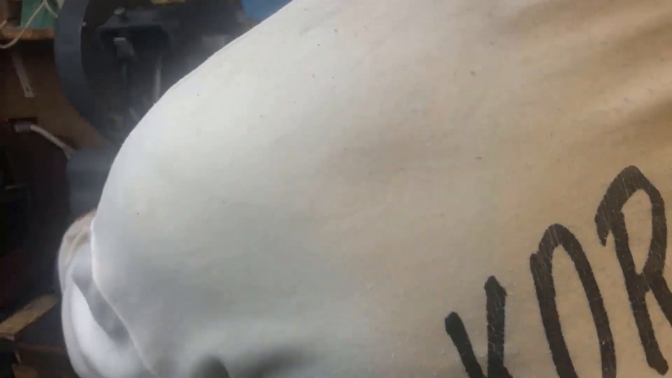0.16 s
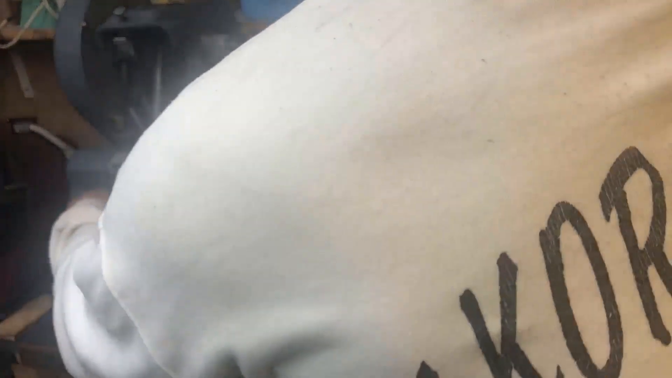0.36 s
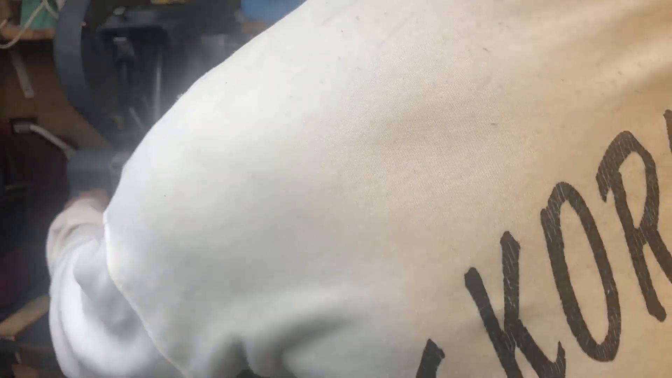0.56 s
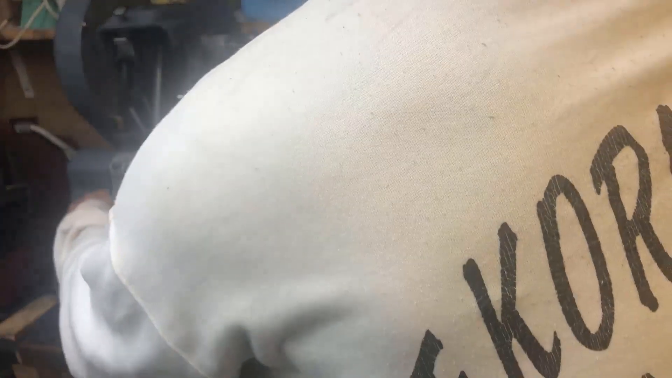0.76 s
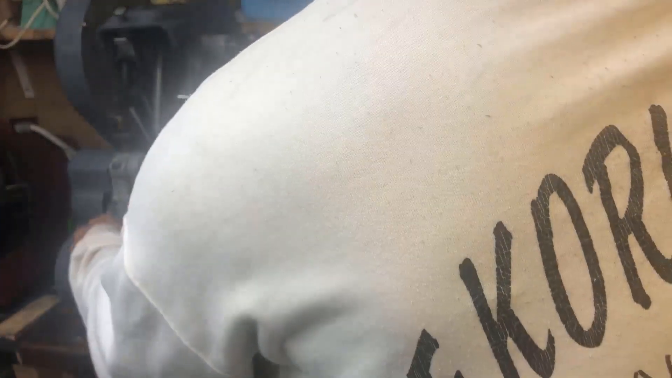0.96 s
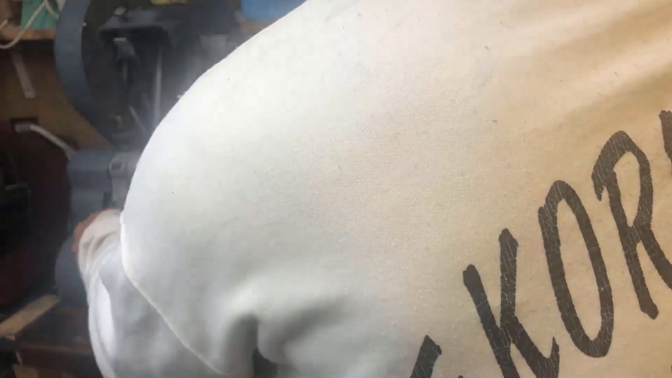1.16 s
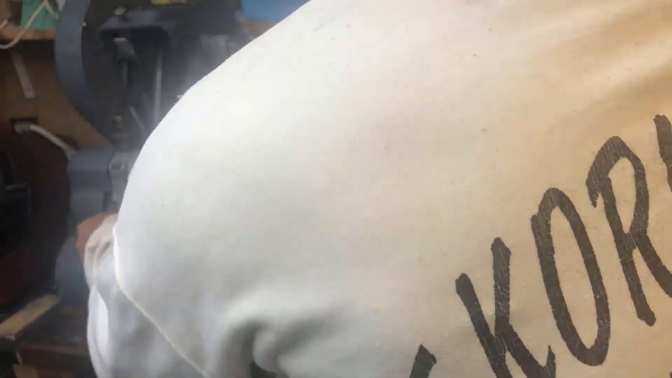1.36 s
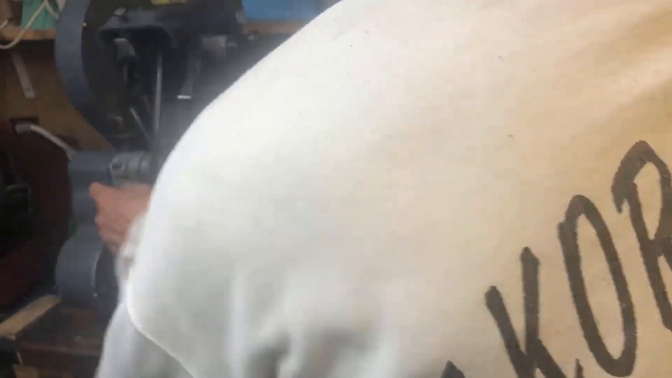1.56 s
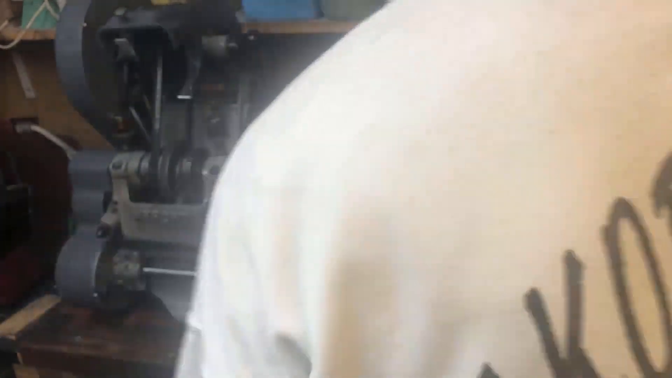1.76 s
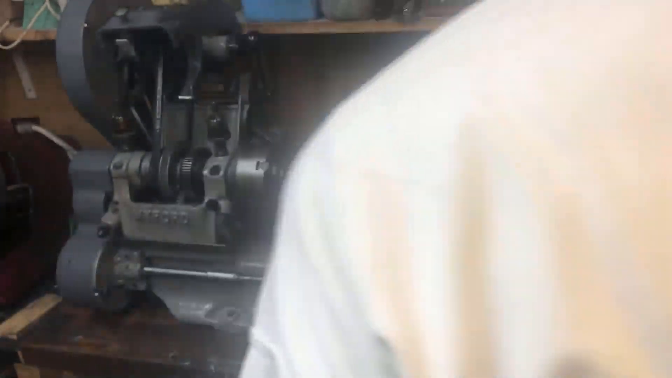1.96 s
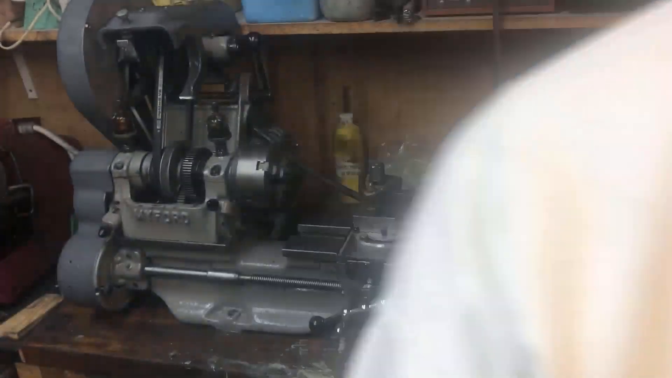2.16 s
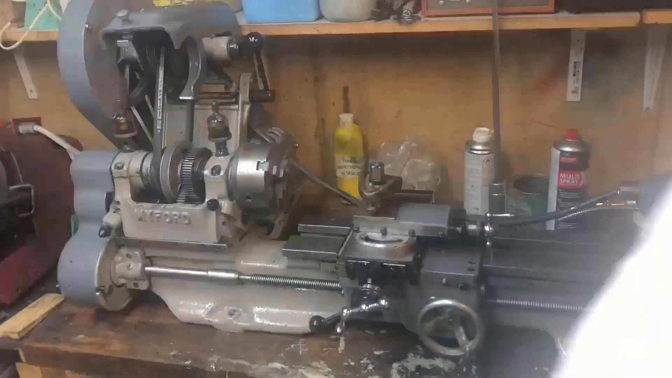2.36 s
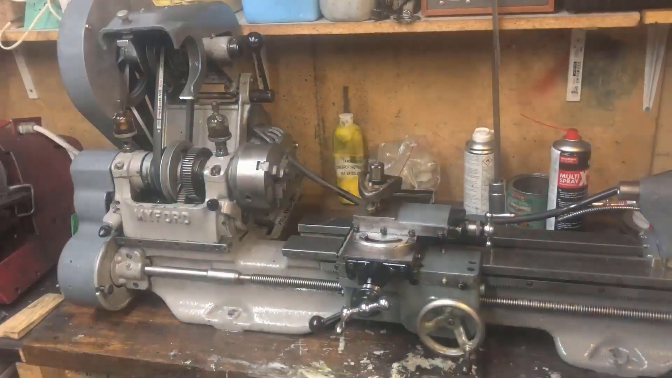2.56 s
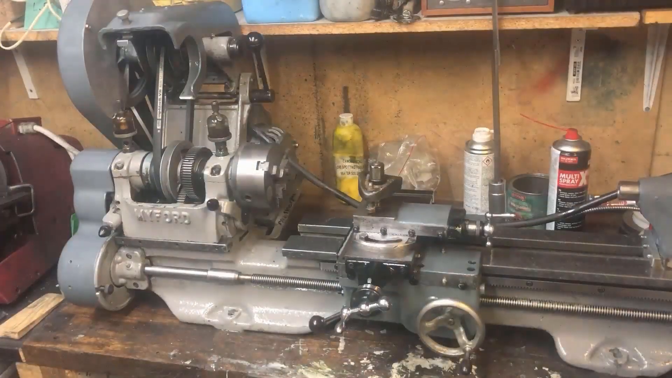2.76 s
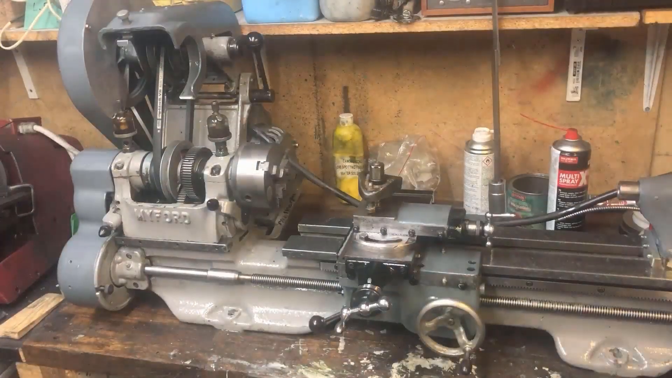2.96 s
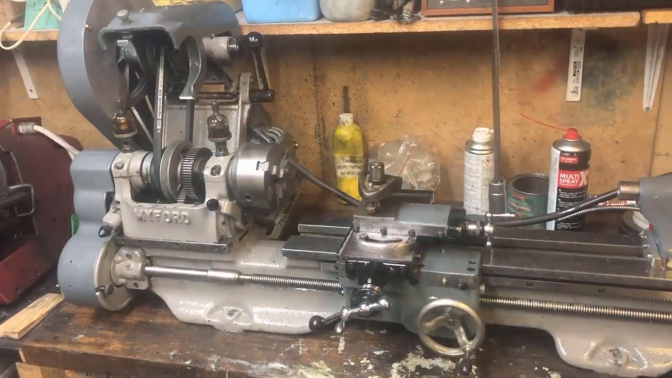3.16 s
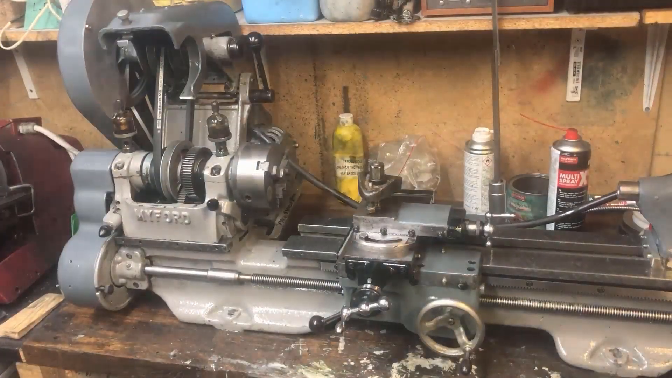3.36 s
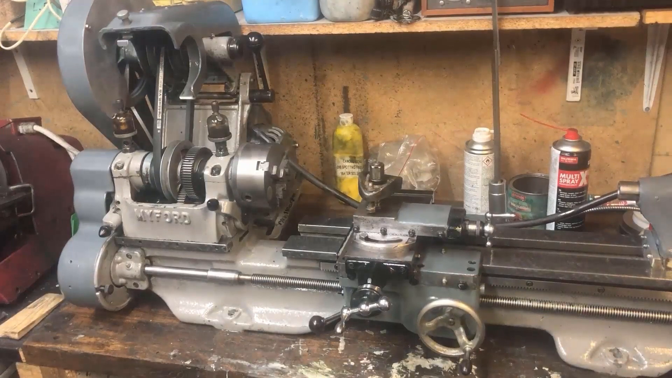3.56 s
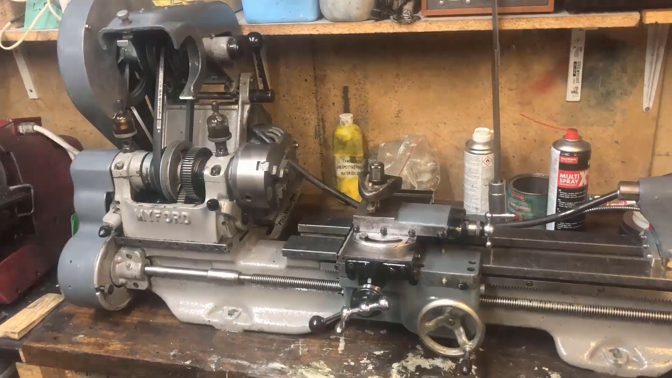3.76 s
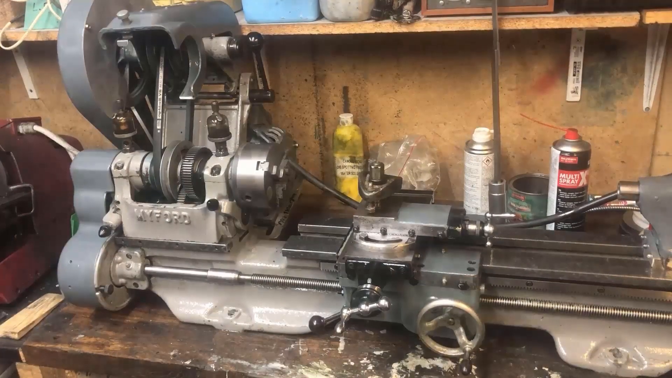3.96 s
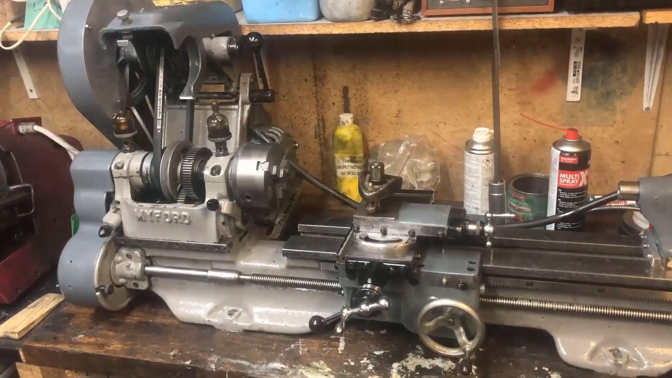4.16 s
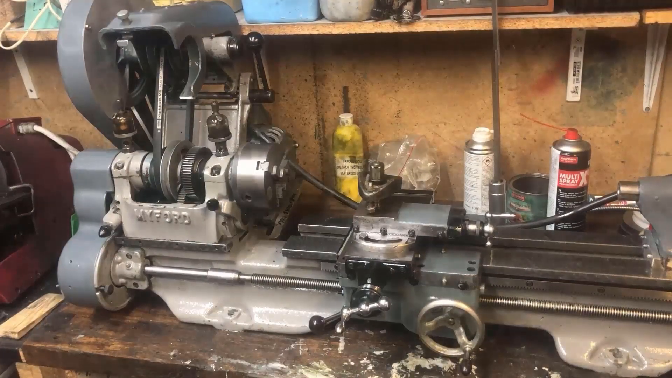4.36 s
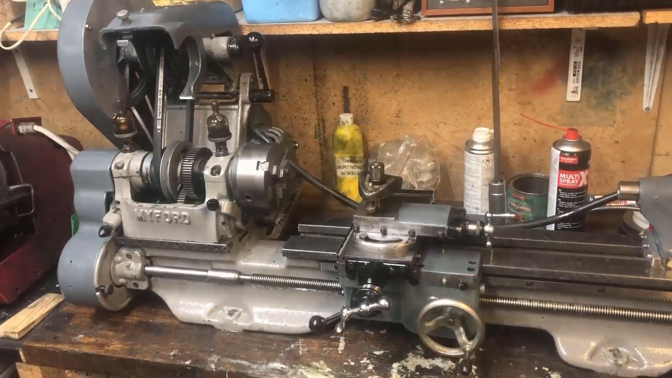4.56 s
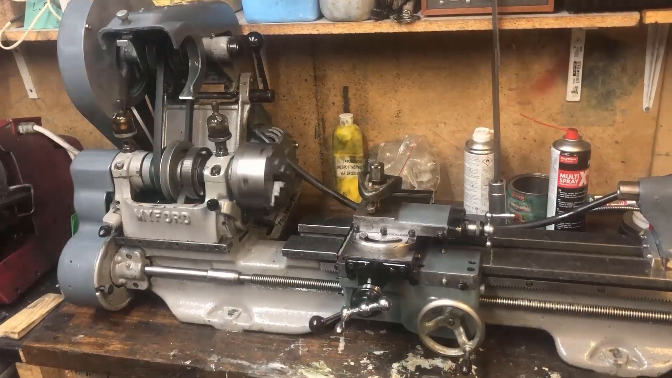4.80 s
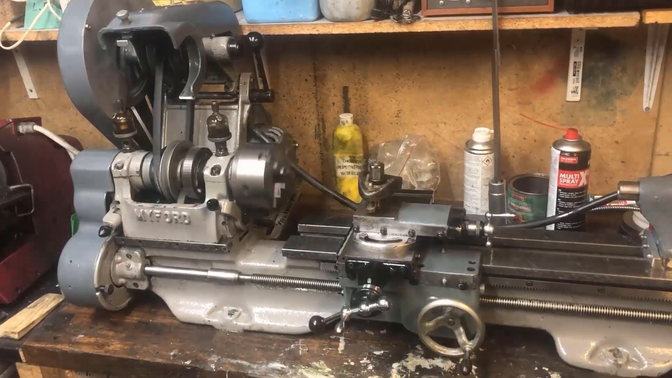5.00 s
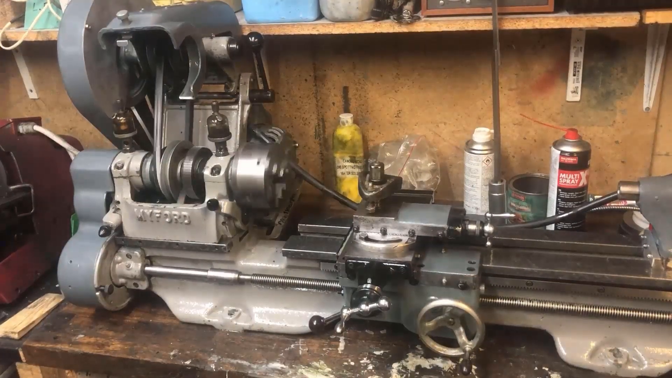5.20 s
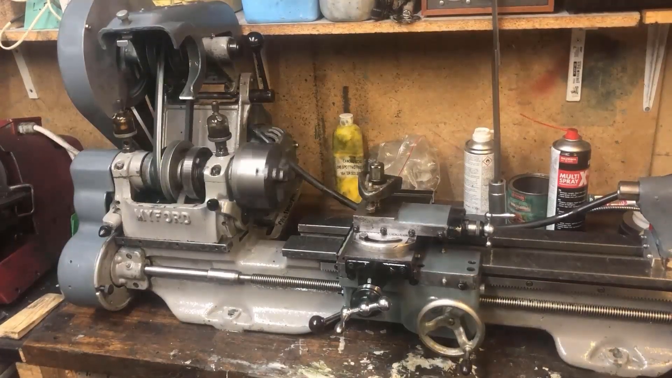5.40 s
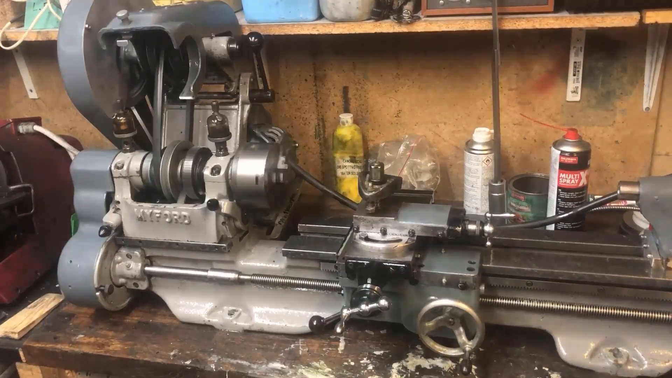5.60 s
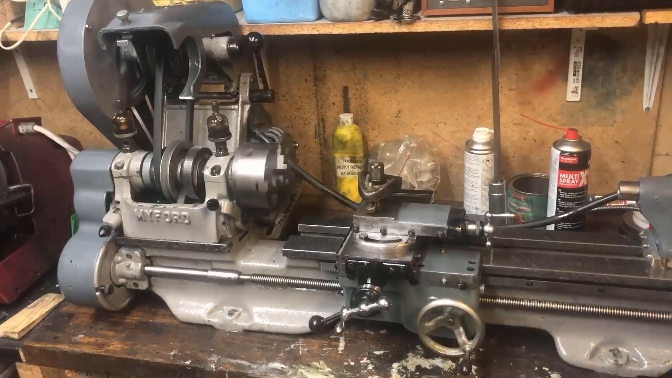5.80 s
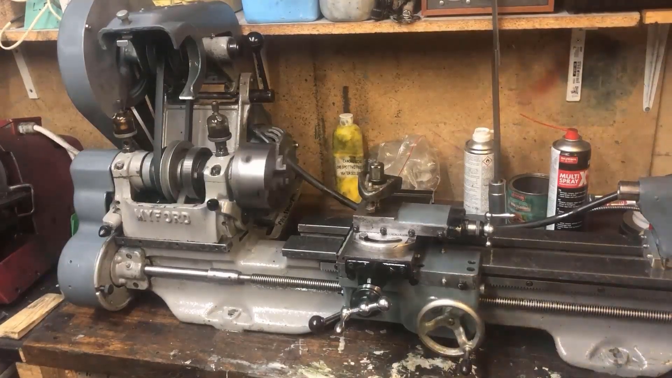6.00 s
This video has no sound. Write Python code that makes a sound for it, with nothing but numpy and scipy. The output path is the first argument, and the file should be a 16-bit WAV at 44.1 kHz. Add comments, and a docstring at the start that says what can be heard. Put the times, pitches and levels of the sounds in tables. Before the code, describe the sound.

A small metal lathe is handled close by in a quiet workshop with a faint hum. In the first second and a half, levers knock against their stops, with dull thuds and several snaps of a steel catch. A shirt rubs softly on and off until about four seconds, among light steel clinks. A loose handle rings once near 2.8 seconds, and a knock follows at 3.1. At about 4.1 and 4.6 seconds two heavy, ringing iron clunks engage the drive, with thuds and a faint lever scrape between them. At 4.7 seconds the motor starts with a loud jolt and a low shudder through the bench. From there to the end, around six seconds, the lathe runs, much louder than the handling: gears whir and whine, the iron body rings, the wheels rattle and jingle, and a clack repeats about six times a second.

```python
"""A small bench lathe in a quiet, faintly humming workshop. First someone sets its levers and steps aside:
knocks, thuds, a snapping catch, steel clinks and the rub of a shirt. After four seconds two heavy clunks
engage the drive, a lever scraping between them. Then the motor starts with a jolt that shakes the bench.
To the end the gears whir: the meshes whine, tooth impacts ring the iron casting, the wheels rattle and
jingle, and the backlash clacks once a turn of the spindle."""
import sys
import numpy as np
from scipy import signal
from scipy.fft import rfft, irfft
from scipy.io import wavfile
from scipy.ndimage import uniform_filter1d

SR = 44100
rng = np.random.default_rng(int(sys.argv[2]) if len(sys.argv) > 2 else 0)


def to_wav(s):
    """Save 16-bit WAV."""
    ch = np.atleast_2d(s).T  # columns
    pcm = np.round(np.clip(ch, -1, 1) * 32767)  # PCM
    wavfile.write(sys.argv[1], SR, pcm.astype(np.int16))


N = 266364
TIME = np.arange(N) / SR
START_S, SPIN_UP_S, SPINDLE_HZ = 4.715, .035, 5.72
THUD_TONE = dict(slope_db=-8.5, ring_hz=335, ring_db=7.5)

# Room tone. Each row: frequency in Hz, relative level in dB.
AIR_COLOUR = [(15, -67), (25, -28), (60, -15), (98, -2.5), (140, -11.5), (205, -12), (289, -9.5),
              (582, -17), (666, -20.5), (1240, -24), (1340, -26.5), (1710, -27), (6550, -32.5),
              (15500, -36)]
# Mains hum. Each row: pitch in Hz, level in dB.
HUM_TONES = [(100, -72), (200, -67.5)]
# Colour of rubbing cloth. Each row: frequency in Hz, relative level in dB.
CLOTH_COLOUR = [(100, -25), (400, 1), (1500, 2.5), (4000, 0), (8000, -3.5), (15500, -8.5)]
# Moves of the shirt. Each row: middle in seconds, half length in seconds, level in dB.
SHIRT_MOVES = [(0.0, 0.29, -56), (0.396, 0.039, -60), (1.674, 0.038, -59), (1.75, 0.02, -57.5),
               (1.86, 0.11, -62.5), (2.1, 0.12, -55), (2.265, 0.03, -59.5), (2.32, 0.036, -64),
               (2.547, 0.16, -58.5), (2.662, 0.017, -64), (2.95, 0.03, -64), (3.006, 0.29, -62),
               (3.41, 0.057, -59.5), (3.774, 0.028, -60), (4.02, 0.02, -62)]
# Decay of the room. Each row: frequency in Hz, T60 in seconds.
ROOM_DECAY = [(80, 0.71), (210, 0.2), (560, 0.23), (1470, 0.16), (3880, 0.18), (10200, 0.14)]
# Ring of the lever linkage. Each row: pitch in Hz, width in Hz, peak in dB.
LINKAGE_MODES = [(282, 34, 5.5), (465, 70, 1), (990, 23, 5), (1710, 150, 0), (3310, 53, 3)]
# Levers thrown home, a step and the jolts of the start. Each row: start in seconds, level in dB,
# contact in seconds, body in Hz, slope above the body in dB per octave, ring in Hz.
HARD_KNOCKS = [(0.046, -33.5, 0.0024, 241, -9.5, 790), (0.103, -40, 0.001, 280, -6.5, 1730),
               (0.4, -49.5, 0.017, 189, -3.5, 430), (0.429, -46.5, 0.0081, 239, -7, 418),
               (0.951, -36.5, 0.0032, 218, -2, 2850), (1.282, -54.5, 0.011, 300, -4, 2700),
               (1.301, -34.5, 0.0017, 230, -1.3, 1950), (1.398, -55.5, 0.0093, 497, -12, 1100),
               (1.599, -48, 0.0084, 220, -4, 447), (3.1, -43, 0.0008, 120, -6, 1500),
               (4.284, -50.5, 0.049, 80, -4.5, 900), (4.351, -42, 0.015, 150, -4.5, 885),
               (4.578, -44, 0.0051, 400, -4, 2000), (4.711, -38.5, 0.0082, 129, -2.5, 3600),
               (4.722, -25.5, 0.0052, 120, -2.5, 830), (4.747, -24.5, 0.0021, 1500, -0.5, 5830),
               (4.753, -22, 0.0012, 100, -4, 740), (4.795, -29.5, 0.0047, 606, -16, 700),
               (4.992, -26.5, 0.0021, 82.5, -1.5, 292)]
# Bench and floor. Each row: start in seconds, level in dB, contact in seconds, body in Hz.
DULL_THUDS = [(0.112, -40, .004, 247), (0.16, -42.5, 0.0073, 270), (0.25, -55.5, 0.0065, 278),
              (1.306, -36, 0.002, 290), (3.108, -44.5, 0.005, 106), (3.16, -73, 0.0071, 95),
              (3.495, -56.5, 0.0091, 80), (4.228, -40, 0.0031, 139), (4.252, -46, .005, 81),
              (4.377, -32, 0.0019, 153), (4.419, -41.5, 0.0039, 103), (4.45, -43.5, 0.0066, 97),
              (4.607, -37, 0.0069, 82), (4.633, -38.5, 0.0027, 220), (4.705, -28.5, 0.0081, 131)]
# Snaps of a steel catch. Each row: start in seconds, level in dB, contact in seconds.
CATCH_SNAPS = [(0.104, -39, 0.0035), (0.143, -48.5, .005), (0.441, -50, .002), (0.672, -53, 0.0089),
               (0.712, -52, .0015), (0.83, -50.5, 0.0029)]
# Broad colour of the catch. Each row: frequency in Hz, relative level in dB.
CATCH_COLOUR = [(200, -16), (600, 0), (1000, 2.5), (2300, -1), (4000, -4), (6000, -7.5), (8000, -15),
                (15500, -32)]
# Bright ring of the catch. Each row: pitch in Hz, width in Hz, peak in dB.
CATCH_MODES = [(1780, 170, 0), (3330, 190, 3), (3660, 140, 1), (4900, 160, -2), (5600, 200, 7)]
# Small steel parts touching. Each row: start in seconds, level in dB, contact in seconds,
# slope in dB per octave, ring in Hz, ping level in dB.
STEEL_CLINKS = [(0.54, -62.5, .001, 4, 5840, -72), (0.81, -55, 0.0039, -8, 1130, -62),
                (1.087, -55, 0.0019, -11, 1710, -58), (1.148, -62.5, .005, -13, 1620, -53),
                (1.472, -58.5, 0.0023, -5.5, 1665, -51), (1.972, -58, 0.0005, -9, 1370, -66),
                (2.368, -48, 0.0041, -1.5, 2020, -60), (2.818, -43, 0.022, -4, 1600, -44),
                (3.466, -53.5, .002, -4, 980, -64), (3.719, -58, .0033, -2, 2780, -76),
                (3.75, -75, .004, -2, 3120, -56)]
# Ring of a loose steel handle. Each row: pitch in Hz, relative level in dB, T60 in seconds.
HANDLE_RING = [(1138, -7, .16), (1311, 0, .17), (1448, -10, .2), (1532, -7, .15), (1661, -5, .12),
               (1790, -9, .13), (1968, -9, .14), (3192, -12, .08)]
# The drive engaging. Each row: start in seconds, latch level in dB, its slope in dB per octave,
# its ring in Hz, seating thud in dB, ring of the iron in dB.
DRIVE_CLUNKS = [(4.128, -34.5, -6.5, 920, -31.5, -25), (4.583, -26, -4.5, 3070, -25, -21)]
# The iron after a clunk. Each row: pitch in Hz, relative level in dB, T60 in seconds.
IRON_RING = [(163, -6, .13), (266, -5, .18), (366, 1, .13), (455, 1.5, .13), (530, -5, .1), (850, -11, .22),
             (888, -9, .2), (1430, -18, .1), (1825, -20, .11)]
# Song of the sliding lever. Each row: pitch in Hz, width in Hz, relative level in dB.
SLIDE_MODES = [(925, 35, 0), (2870, 130, -15), (3180, 110, -15)]
# Motor and meshes at full speed. Each row: pitch in Hz, level in dB.
WHINE_TONES = [(77, -56), (83.8, -55), (119.5, -58), (146, -56), (198, -58), (241.4, -48.5), (317, -53),
               (482.6, -54), (543.5, -50.5), (558, -52), (636.6, -49), (684, -54), (759, -55), (829, -50.5),
               (866.5, -49.5), (977, -48), (1040, -52), (1206, -54), (1126, -50.5), (1379, -53),
               (1739, -53), (2059, -51), (2109, -51.5), (2274.7, -51.5), (2600, -42.7)]
# Swell of the main mesh tone. Each row: time in seconds, level in dB.
MESH_SWELL = [(4.8, -39), (4.97, -38), (5.2, -44), (5.55, -47), (5.75, -40), (6.0, -40.5)]
# Broad colour of the casting. Each row: frequency in Hz, relative level in dB.
CASTING_COLOUR = [(25, -54), (45, -1), (70, -2.5), (130, -2.5), (350, -1), (700, -1), (1100, 0),
                  (1400, 0.5), (2500, -1), (4000, -5), (4700, -9.5), (6800, -17), (8500, -24.5),
                  (12000, -26.5), (15500, -34)]
# Ring of casting and guards. Each row: pitch in Hz, width in Hz, relative level in dB.
CASTING_MODES = [(550, 30, 3), (700, 30, 1), (832, 30, 1), (965, 30, 6), (1050, 40, 3), (1125, 30, 2),
                 (1497, 18, 4), (1754, 22, 5), (2208, 24, 4), (2440, 24, 1), (2600, 42, 2), (2708, 20, 4),
                 (2985, 36, 5), (3260, 38, 0), (3488, 30, 2), (3626, 24, 2), (3957, 30, 2)]
# Bright ring of the gear wheels. Each row: pitch in Hz, width in Hz, relative level in dB,
# extra gain for a clack in dB.
GEAR_WHEEL_MODES = [(4160, 50, 3, 7), (4224, 30, 14, 8), (4995, 40, 5, 10), (5420, 36, 17, 7),
                    (6022, 60, 13.5, 8), (7280, 80, 10, 9), (7520, 80, 15.5, 11), (7650, 60, 6, 10),
                    (7870, 60, 1, 10)]
# Jingle of the wheel rims. Each row: pitch in Hz, relative level in dB.
RIM_RING = [(9530, -8), (9690, -4), (9910, 0), (10300, 1), (10720, -7), (11500, -3), (11600, -4),
            (12350, -11), (13750, -11)]
# Low boom of the bench. Each row: pitch in Hz, relative level in dB, T60 in seconds.
BENCH_RING = [(63.2, 3, 0.35), (76, -2, 0.62)]
# Backlash, turn by turn. Each row: force in dB, tick against that force in dB, clang in Hz, clang in dB.
TURN_CLACKS = [(3.5, -28, 4222, -48), (7, -13, 5420, -40), (5, -13, 10000, -46.5), (1.5, -11, 4222, -32),
               (6.5, -7.5, 6022, -34.5), (3, -10.5, 5420, -43), (6, -18, 4222, -36)]
# Stray slaps of the teeth. Each row: start in seconds, then the same four columns as a clack.
STRAY_SLAPS = [(4.808, 2.5, -8, 5400, -34.5), (4.913, -21, 5, 5420, -60), (5.091, -15, -10, 4222, -47),
               (5.157, -6.5, -20, 6000, -42.5), (5.313, -6.5, 5.5, 9910, -55),
               (5.343, -3, -10, 7490, -45.5), (5.365, -0.5, -10, 7470, -44.5), (5.457, -4, -13, 4222, -42),
               (5.626, -1.5, -5, 4222, -38), (5.67, -3, -4, 11800, -60), (5.797, -14, -12, 4270, -48),
               (5.863, 2, -13, 4250, -35)]


def amp(db):
    """Decibels to gain."""
    return np.exp(np.asarray(db) * np.log(10) / 20)


def unit(x):
    """Scale to rms 1."""
    return x / np.sqrt(np.mean(x ** 2) + 1e-20)


def on_log(hz, points):
    """Read (Hz, value) points on a log-frequency axis."""
    at, value = np.transpose(points)
    return np.interp(np.log(hz), np.log(at), value)


def freqs(x):
    """Frequencies of the spectrum of x."""
    return np.maximum(np.arange(len(x) // 2 + 1) * SR / len(x), 1)


def colour(x, points):
    """EQ with a curve of (Hz, dB) points."""
    return irfft(rfft(x) * amp(on_log(freqs(x), points)), len(x))


def resonance(f, hz, width):
    """Response of one mode, 1 at its centre."""
    return 1 / (1 + 1j * (f / hz - hz / f) * hz / width)


def peaks(f, modes):
    """A flat response with (Hz, width Hz, dB) modes added in power."""
    return np.sqrt(1 + sum(abs(amp(db) * resonance(f, hz, width)) ** 2 for hz, width, db in modes))


def walk(rate):
    """Random drift of rms 1, gliding to a new value rate times a second."""
    hold = max(int(SR / rate), 1)
    steps = np.repeat(rng.standard_normal(N // hold + 1), hold)
    return unit(uniform_filter1d(steps, hold)[:N])


def add(track, s, sound):
    """Mix a sound into the track at s seconds."""
    i = int(s * SR)
    track[i:i + len(sound)] += sound[:N - i]


def room_tone(air_db=-59, waver_db=2.2):
    """Softly drifting air and a wavering mains hum."""
    air = amp(air_db + walk(2.43)) * unit(colour(rng.standard_normal(N), AIR_COLOUR))
    hum = sum(amp(db + waver_db * walk(4.94)) * np.sin(2 * np.pi * hz * TIME + 0.58 * walk(4.2))
              for hz, db in HUM_TONES)
    return air + np.sqrt(2) * hum


def shirt_rustle():
    """Cloth rubs with a fine grain, one swell for each move."""
    rub = unit(colour(rng.standard_normal(N) * amp(walk(180)), CLOTH_COLOUR))
    return rub * sum(amp(db) * np.exp(-((TIME - s) / half_s) ** 2) for s, half_s, db in SHIRT_MOVES)


def ring_out(gain, contact_s, db, swell_cycles=0.96, late_db=-28, late_t60=0.2):
    """Dense modes shaped by gain(Hz) swell during contact and die with the room; lows lag and linger."""
    t = TIME[:20000]
    f = freqs(t)
    modes = gain(f) * np.exp(2j * np.pi * rng.random(len(f)))
    late = amp(late_db - 60 * t / late_t60)
    octaves = np.geomspace(60, 15360, 9)
    out = 0
    for hz, share in zip(octaves, np.eye(len(octaves))):
        band = irfft(modes * np.interp(np.log(f), np.log(octaves), share), len(t))
        rise_s = contact_s + swell_cycles / hz
        early = np.exp(-np.log(1000) * np.maximum(t - rise_s, 0) / on_log(hz, ROOM_DECAY))
        out = out + band * np.minimum(t / rise_s, 1) * np.hypot(early, late)
    return amp(db) * out / np.std(out[:2000])  # db sets the first 45 ms


def blow(db, contact_s, body_hz, slope_db, ring_hz, ring_db, soft_hz=7000, ring_loss=0.07):
    """A blow rings a part above its body frequency, with one mode of its own, and the linkage with it."""
    def gain(f):
        ratio = f / body_hz
        low_cut = ratio ** 2.9 / np.hypot(1, ratio ** 2.9)
        tilt = amp(slope_db * np.log2(np.hypot(1, ratio)))
        high_cut = 1 / np.hypot(1, (f / soft_hz) ** 1.8)
        ring = peaks(f, [(ring_hz, 70 + ring_loss * ring_hz, ring_db), *LINKAGE_MODES])
        crack = amp(-47) * f / np.hypot(f, soft_hz)  # even a dull blow has a faint hard edge
        return np.hypot(low_cut * tilt * high_cut * ring, crack)
    return ring_out(gain, contact_s, db)


def knocks():
    """Hard parts strike their stops; bench and floor give dull thuds."""
    out = np.zeros(N)
    for s, db, contact_s, body_hz, slope_db, ring_hz in HARD_KNOCKS:
        add(out, s, blow(db, contact_s, body_hz, slope_db, ring_hz, ring_db=11.5))
    for s, db, contact_s, body_hz in DULL_THUDS:
        add(out, s, blow(db, contact_s, body_hz, **THUD_TONE))
    return out


def catch_snaps():
    """A steel catch snaps over its notches, always with the same bright ring."""
    def gain(f):
        return amp(on_log(f, CATCH_COLOUR)) * peaks(f, CATCH_MODES)
    out = np.zeros(N)
    for s, db, contact_s in CATCH_SNAPS:
        add(out, s, ring_out(gain, contact_s, db))
    return out


def chime(modes, rise_s=0.0055, detune=0.0017, size=16000):
    """A free ring: each (Hz, dB, T60 s) mode is a decaying tone, never struck quite alike."""
    t = TIME[:size]
    out = 0
    for hz, db, t60 in modes:
        pitch = hz * (1 + detune * rng.standard_normal())
        tone = np.sqrt(2) * np.sin(2 * np.pi * (pitch * t + rng.random()))
        out = out + amp(db) * tone * np.exp(-np.log(1000) * t / t60)
    return out * np.minimum(t / rise_s, 1)


def clinks(body_hz=675, ping_t60=0.093, handle_s=2.815):
    """Small parts touch with a thin tick and a short ping; a loose handle rings once."""
    out = np.zeros(N)
    for s, db, contact_s, slope_db, ring_hz, ping_db in STEEL_CLINKS:
        tick = blow(db, contact_s, body_hz, slope_db, ring_hz, ring_db=7, soft_hz=10200, ring_loss=0.088)
        add(out, s, tick)
        add(out, s, chime([(ring_hz, ping_db, ping_t60)]))
    add(out, handle_s, amp(-38) * chime(HANDLE_RING, rise_s=.009))
    return out


def drive_clunks(seat_lag_s=0.0084):
    """The latch snaps first; a moment later the heavy part seats and the iron rings on."""
    out = np.zeros(N)
    for s, latch_db, slope_db, ring_hz, seat_db, iron_db in DRIVE_CLUNKS:
        add(out, s, blow(latch_db, contact_s=0.0081, body_hz=567, slope_db=slope_db,
                         ring_hz=ring_hz, ring_db=7.5, soft_hz=10400))
        add(out, s + seat_lag_s, blow(seat_db, contact_s=0.0033, body_hz=151, **THUD_TONE))
        add(out, s + seat_lag_s, amp(iron_db) * chime(IRON_RING))
    return out


def lever_scrape(middle_s=4.34, half_s=.04, level_db=-52.5):
    """Between the clunks the lever slides in its guide; friction makes it sing faintly."""
    ring = sum(amp(db) * resonance(freqs(TIME), hz, width) for hz, width, db in SLIDE_MODES)
    friction = unit(irfft(rfft(rng.standard_normal(N)) * ring, N))
    return amp(level_db) * friction * np.exp(-((TIME - middle_s) / half_s) ** 4)


def whine(speed, mesh_hz=947.5, waver=0.00051, flutter_db=2):
    """Motor and mesh tones follow the speed, which wavers with the belt; the main mesh dips and swells."""
    run_s = np.cumsum(speed * (1 + waver * walk(14.77))) / SR
    tones = WHINE_TONES + [(mesh_hz, np.interp(TIME, *np.transpose(MESH_SWELL)))]
    chord = sum(amp(db + flutter_db * walk(8.5)) * np.sin(2 * np.pi * hz * run_s) for hz, db in tones)
    return np.sqrt(2) * speed * chord


def lingering(force, t60):
    """Envelope of the vibration that a force leaves in the iron and the small room."""
    keep = np.exp(-2 * np.log(1000) / (t60 * SR))
    return np.sqrt(signal.lfilter([1 - keep], [1, -keep], force ** 2 + 1e-18))


def with_tail(force, direct_db, room_db, t60=.28):
    """Direct impacts plus a diffuse tail of noise; turning wheels never repeat a path."""
    return amp(direct_db) * force + amp(room_db) * lingering(force, t60) * rng.standard_normal(N)


def mode_noise(hz, width):
    """One resonance driven by noise."""
    return signal.lfilter(*signal.iirpeak(hz, hz / width, fs=SR), rng.standard_normal(N))


def tooth_impacts(speed, tooth_hz=610, scatter_db=3, slide_db=-4, chatter_db=0.6):
    """One uneven impact per tooth over sliding friction; the load chatters, and swells once a turn."""
    run_s = np.cumsum(speed) / SR
    meets = np.diff(np.floor(run_s * tooth_hz), prepend=0)
    impacts = meets * rng.standard_normal(N) * amp(scatter_db * np.tanh(rng.standard_normal(N)))
    force = impacts / np.std(impacts[speed > .5]) + amp(slide_db) * rng.standard_normal(N)
    load_db = np.cos(2 * np.pi * SPINDLE_HZ * run_s) - chatter_db * walk(140)
    return force * speed * amp(load_db)


def wheel_rattle(speed, bounces_per_s=110, scatter_db=4):
    """The lightly loaded wheels bounce at uneven moments; returns the envelope of their vibration."""
    bounces = (rng.random(N) < bounces_per_s / SR) * amp(scatter_db * np.tanh(rng.standard_normal(N)))
    return speed * unit(lingering(bounces, t60=.06))


def casting_ring(rolling, struck, low_cut_hz):
    """Casting and guards ring under the rolling teeth; clacks favour their higher modes."""
    out = 0
    for hz, width, db in CASTING_MODES:
        envelope = np.hypot(rolling, amp(5) * struck * hz / np.hypot(hz, low_cut_hz))
        out = out + amp(db) * envelope * mode_noise(hz, width)
    return out


def wheel_ring(rattle, struck, flare_db=5, flares_per_s=45):
    """Bounces and clacks ring the wheels; each mode flares as the contact point wanders."""
    out = 0
    for hz, width, db, struck_db in GEAR_WHEEL_MODES:
        level = amp(db + flare_db * np.tanh(walk(flares_per_s)))
        out = out + level * np.hypot(rattle, amp(struck_db) * struck) * mode_noise(hz, width)
    return out


def rim_jingle(edge, rattle):
    """A hard contact ticks, then the rims' close, high modes ring on; the rattle keeps them shimmering."""
    treble = resonance(freqs(TIME), hz=10000, width=14000) ** 2
    tick = irfft(rfft(with_tail(edge, direct_db=-6, room_db=2)) * treble, N)
    rims = sum(amp(db) * mode_noise(hz, width=45) for hz, db in RIM_RING)
    envelope = np.hypot(lingering(edge, t60=.12), amp(-27) * rattle)
    return amp(-33) * tick + amp(-15) * rims * envelope


def gears(speed, whir_db=-31.5, low_cut_hz=1700):
    """Teeth, rattle and backlash sound through the casting, with clang and jingle on top."""
    f = freqs(TIME)
    teeth, rattle = tooth_impacts(speed), wheel_rattle(speed)
    slap, edge, clang = backlash()
    rolling, struck = lingering(teeth, t60=0.17), lingering(slap, t60=0.12)
    ring = amp(1) * casting_ring(rolling, struck, low_cut_hz) + wheel_ring(rattle, struck)
    clacks = amp(11) * with_tail(slap, direct_db=-3.5, room_db=-6)
    bounces = amp(-13) * rattle * rng.standard_normal(N)
    meshing = with_tail(teeth, direct_db=-5, room_db=-5.5)
    low_cut = 1j * f / (low_cut_hz + 1j * f)  # short, hard hits carry little bass
    spectrum = rfft(meshing + ring) + rfft(clacks + bounces) * low_cut
    whir = irfft(spectrum * unit(amp(on_log(f, CASTING_COLOUR))), N)
    return (amp(whir_db) * whir + clang + rim_jingle(edge, rattle)) * (speed > 0)


def bench_shudder(start_s=4.772):
    """The starting torque shakes the bench on its low resonances."""
    out = np.zeros(N)
    add(out, start_s, amp(-29) * chime(BENCH_RING, rise_s=0.044, size=30000))
    return out


def backlash(first_s=4.864, burst_s=0.0095, rough_db=4):
    """Teeth bounce in a burst each turn, and in stray slaps; returns force, hard edge and wheel clang."""
    force, edge, clang = np.zeros((3, N))
    t = TIME[:SR // 10]
    clacks = [(first_s + turn / SPINDLE_HZ, *row) for turn, row in enumerate(TURN_CLACKS)]
    for s, db, tick_db, ring_hz, ring_db in clacks + STRAY_SLAPS:
        burst = rng.standard_normal(len(t)) * np.exp(-(t / burst_s) ** 2)
        add(force, s, amp(db) * burst)
        add(edge, s, amp(db + tick_db) * burst * np.exp(-t / burst_s))
        ring = ring_out(lambda f: abs(resonance(f, ring_hz, width=180)) ** 2, contact_s=.003, db=ring_db)
        add(clang, s, ring)
    roughness = amp(rough_db * np.tanh(walk(300)))  # neighbours still touch the clanging wheel
    return force, edge, clang * roughness


def scene():
    """The lathe is set, then spins up and runs."""
    speed = 1 - np.exp(-np.maximum(TIME - START_S, 0) / SPIN_UP_S)
    handling = knocks() + catch_snaps() + drive_clunks() + lever_scrape() + clinks()
    running = gears(speed) + whine(speed) + bench_shudder()
    return (handling + running + room_tone() + shirt_rustle())[None]


def record(dry, top_hz=15850):
    """A steep low-pass trims the very top."""
    return signal.sosfilt(signal.ellip(10, .2, 70, top_hz, fs=SR, output="sos"), dry)


dry = scene()
out = record(dry)
to_wav(out)
```